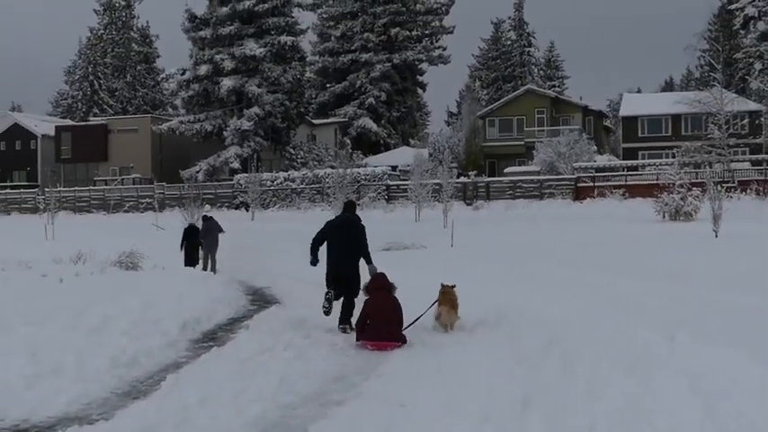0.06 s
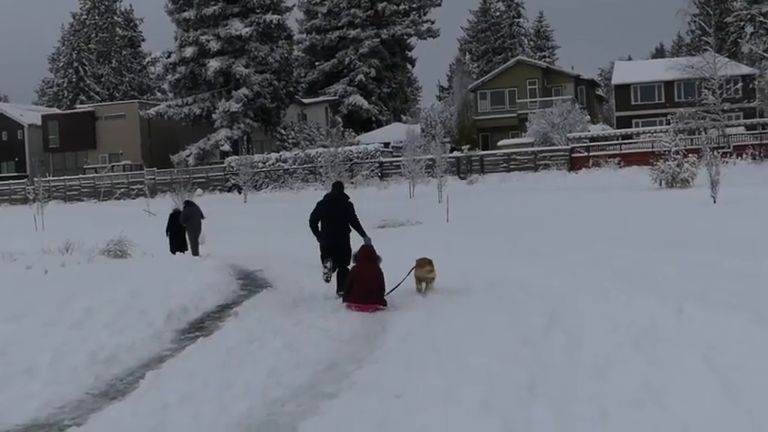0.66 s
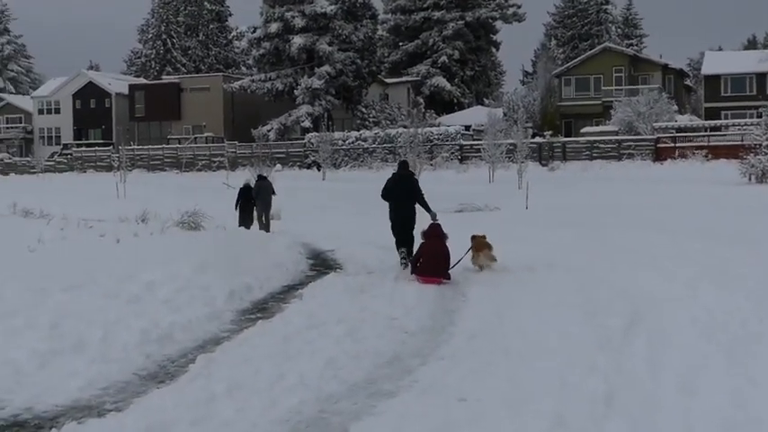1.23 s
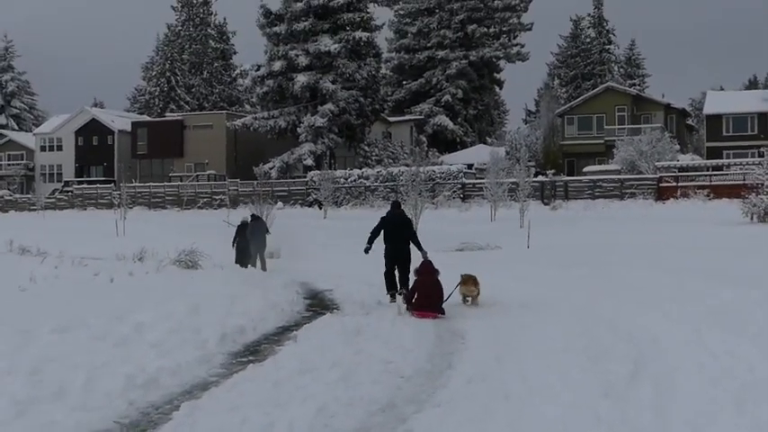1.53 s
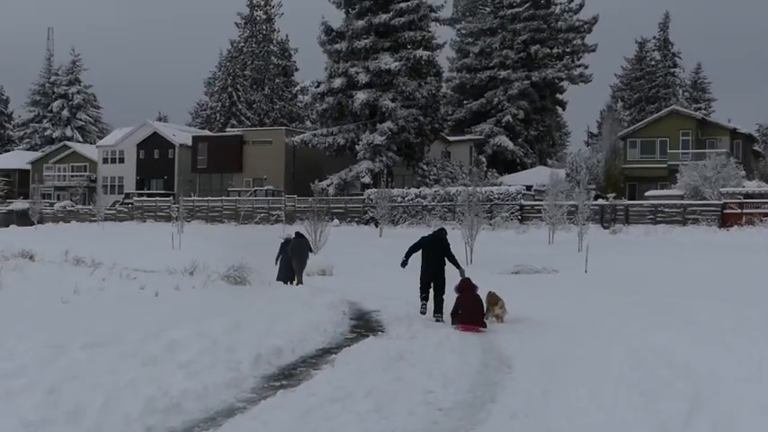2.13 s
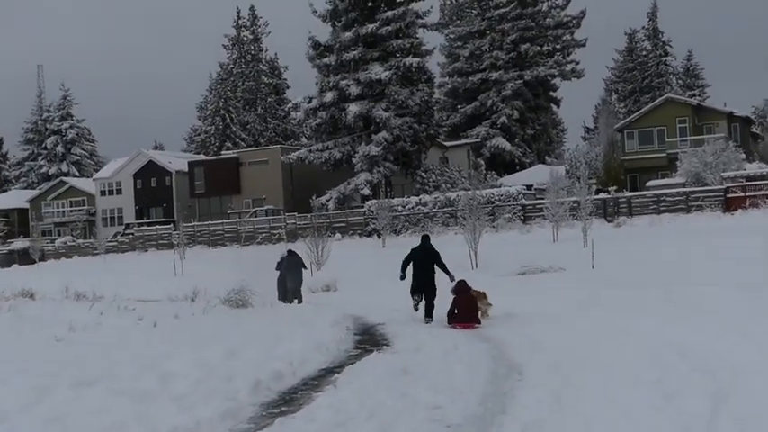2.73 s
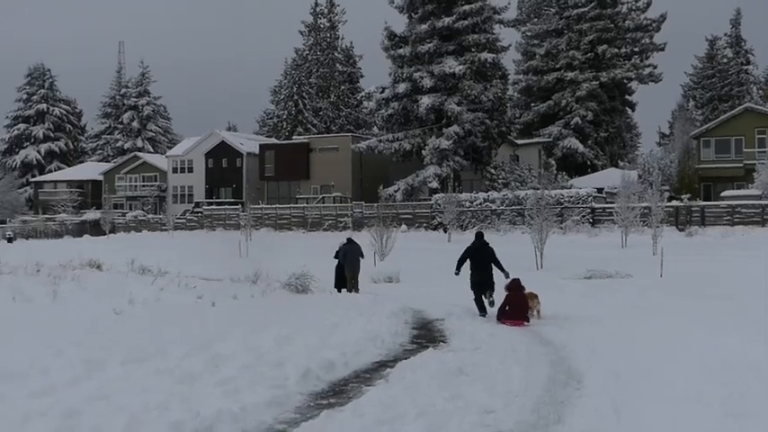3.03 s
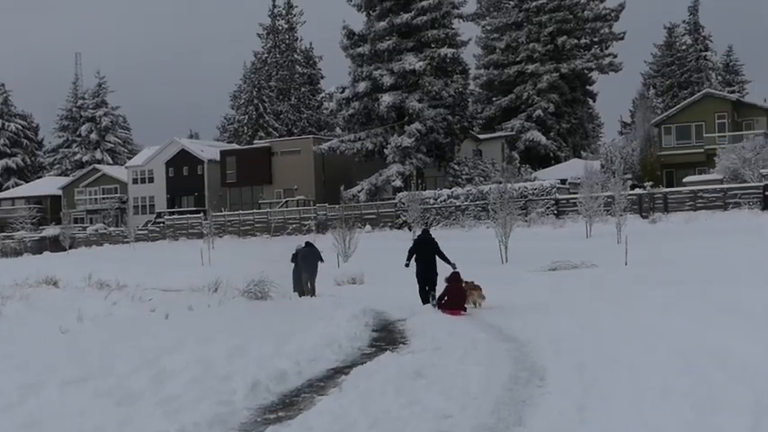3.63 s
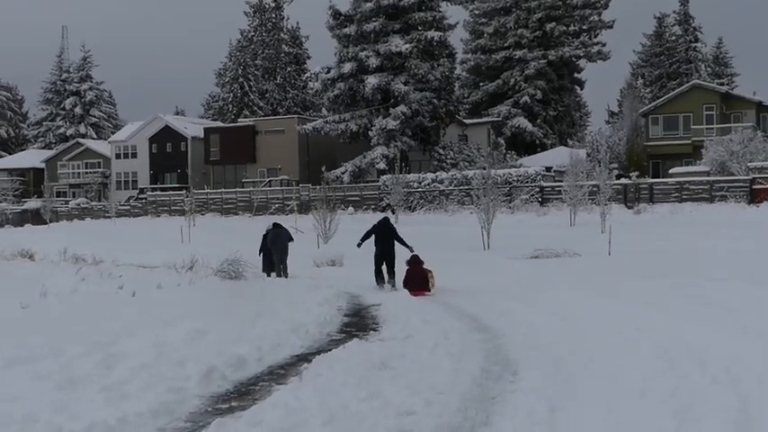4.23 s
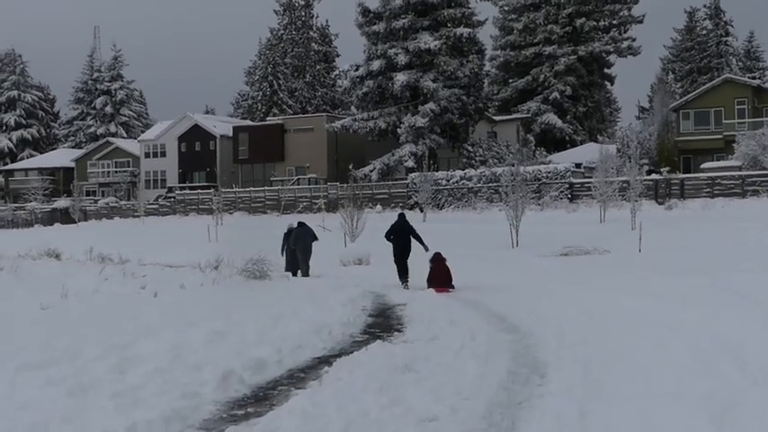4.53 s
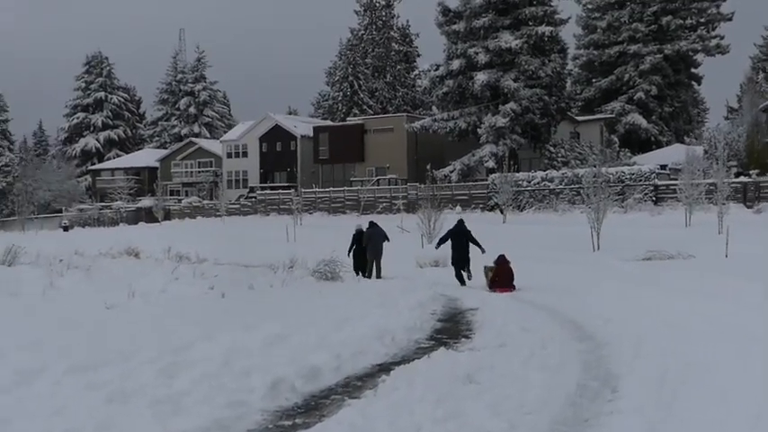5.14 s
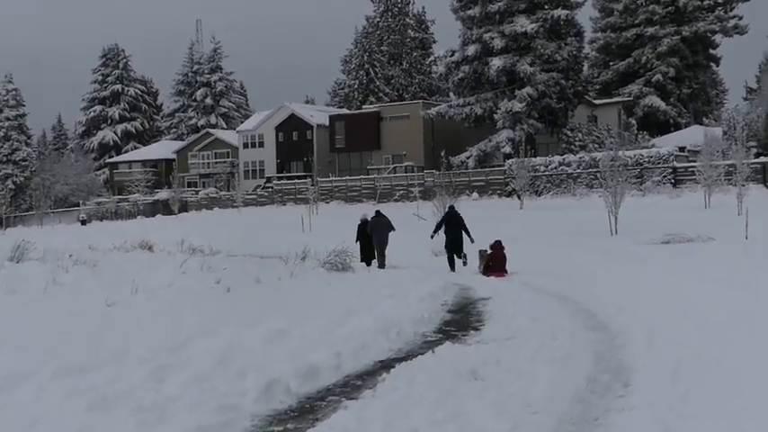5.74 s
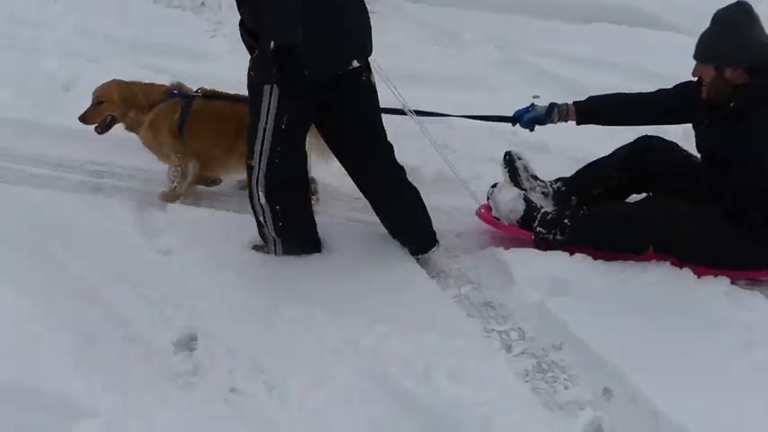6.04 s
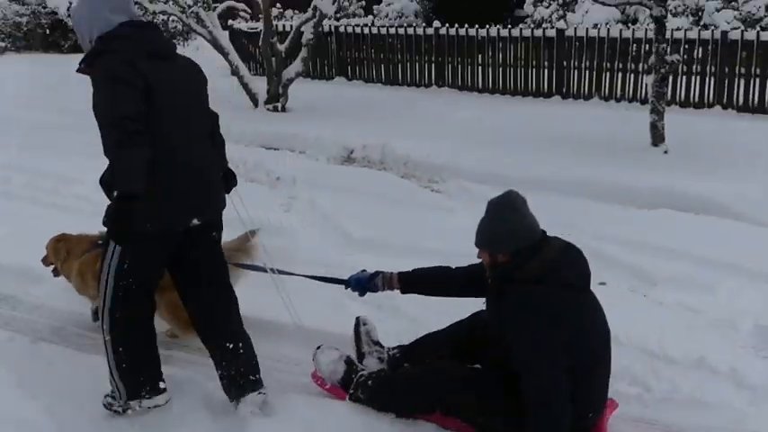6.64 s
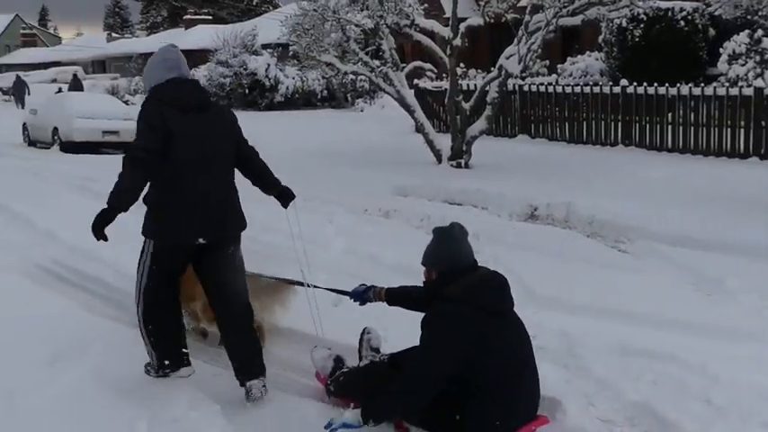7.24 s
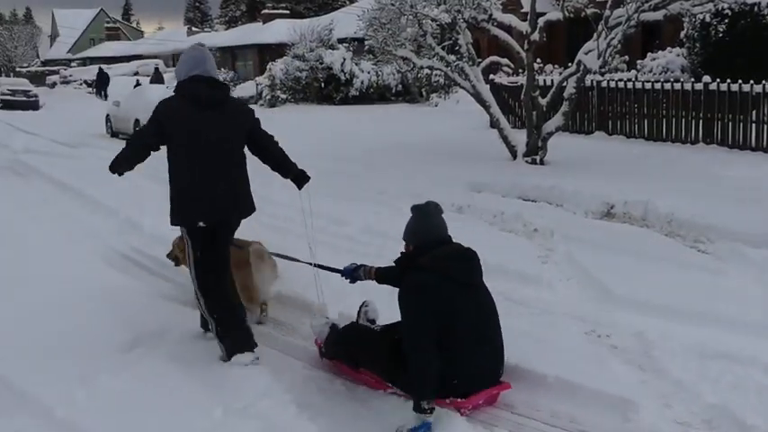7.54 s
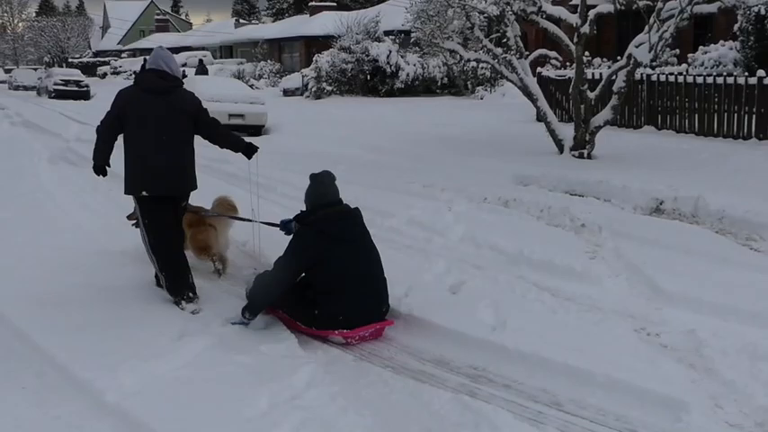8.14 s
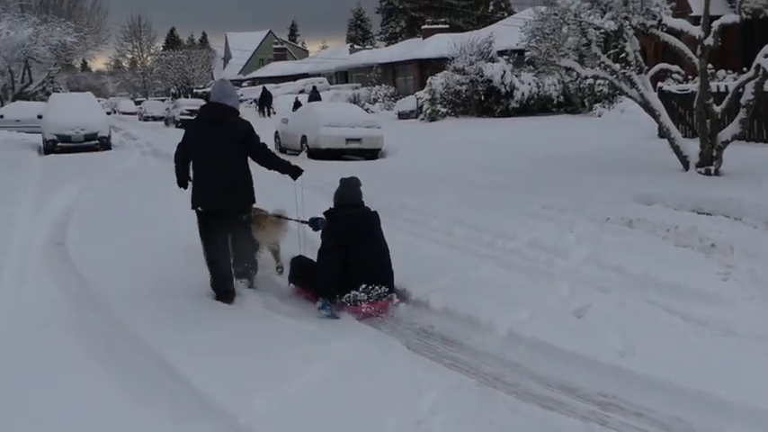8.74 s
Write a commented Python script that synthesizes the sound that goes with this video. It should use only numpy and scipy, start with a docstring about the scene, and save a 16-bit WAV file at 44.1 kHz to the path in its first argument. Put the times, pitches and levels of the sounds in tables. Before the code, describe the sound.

A nylon jacket rustles and squeaks lightly at the left of the microphone as someone treads through soft snow, with short, low bumps over a faint outdoor hush. After a moment of silence about six seconds in, a plastic sled slides by close up, its hollow shell rumbling and scraping with each pull. Loose snow hisses aside, gear clacks and a small clip tinkles faintly.

```python
"""A quiet, snowed-in neighbourhood. Someone walks through fresh, softly creaking snow while nylon
sleeves swish against a jacket on the left. Dull thuds come from footsteps or handling of the camera.
Near six seconds the sound cuts out briefly. It fades back in as a plastic sled is pulled past
close by, surging between the puller's steps. Snow grains break under the shell and make it drum,
loose powder hisses aside, and gear on the sled clacks and tinkles."""
import sys
import numpy as np
from scipy import signal
from scipy.io import wavfile
from scipy.ndimage import uniform_filter1d

SR = 44100
rng = np.random.default_rng(int(sys.argv[2]) if len(sys.argv) > 2 else 0)


def transcribe(u):
    """Save the signal u as a 16-bit wav file named by the first command-line argument.

    u: samples, shape (n,) or (channels, n), limited to [-1, 1]; the rate is SR.
    q: integer samples, one column per channel.
    """
    v = np.clip(np.atleast_2d(u).T, -1, 1)
    q = np.round(v * 32767).astype(np.int16)
    wavfile.write(sys.argv[1], SR, q)


N = 395697
TIME = np.arange(N) / SR
SLED_FROM_S = 6.0   # the walk gives way to the sled while the sound is out

# Tone colours: how strong each pitch is. Each row: frequency in Hz, relative level in dB.
AIR_COLOUR = [(40, -38), (183, 4.5), (461, 1.5), (1160, -11), (5050, -21), (7710, -35.5), (10700, -36.5),
              (13700, -42.5), (15500, -60)]
SNOW_COLOUR = [(26, -55), (45, -44.5), (80, -29.5), (112, 4.5), (188, 4.5), (363, -1), (686, -18.5),
               (1000, -24), (1300, -38.5), (2200, -120)]
JACKET_COLOUR = [(260, -28.5), (450, 3), (600, -11.5), (826, -4.5), (1180, -6), (1890, -13), (3420, -14.5),
                 (4880, -8.5), (7390, -17.5), (9510, -18.5), (15500, -34)]
SLED_COLOUR = [(41, -72), (70, -57), (150, -16.5), (230, -5), (420, 1), (595, -1), (822, -2), (1620, -7),
               (2850, -13), (5800, -22.5), (7690, -30), (11000, -23.5), (15500, -39.5)]
# Where a sound sits. Each row: frequency in Hz, side in dB (above zero is left, below is right).
AIR_SIDE = [(300, -1.5), (2400, 6.5), (15000, 1)]
JACKET_SIDE = [(500, -0.5), (800, 0.5), (1300, 12), (2400, 19), (4400, 5.5), (8000, 7), (15000, 1)]
CENTRE = [(100, -1.1), (1000, 0.87), (10000, 0)]
# How alike left and right are. Each row: frequency in Hz, likeness from 0 (unrelated) to 1 (same).
AIR_LIKENESS = [(100, 0.8), (3000, 0.1), (15000, 0.21)]
WALK_LIKENESS = [(100, 0.85), (300, 0.62), (1400, 0.085), (3000, 0.94), (6500, 0.35), (12000, 0.0)]
SLED_LIKENESS = [(100, 0.97), (7000, 0.92), (15000, 0.5)]

# Hits on plastic gear and on a small metal clip. Each row: start in seconds, level in dB.
GEAR_HITS = [(6.333, -35), (6.338, -30), (6.342, -30.5)]
CLIP_HITS = [(7.117, -51), (7.255, -52), (8.179, -45)]
# The tones they ring with. Each row: pitch in Hz, relative level in dB, ring time in cycles.
GEAR_TONES = [(756, -2, 3.7), (1090, 3, 6.8), (2430, -3, 2), (3970, 1.5, 5.9), (9500, -13, 1.8)]
CLIP_TONES = [(7300, 0, 90), (4540, -4, 73)]
# Nylon and sled plastic squeak.
# Each row: middle in seconds, level in dB, pitch in Hz, fade time in seconds, side in dB.
SQUEAKS = [(0.122, -47.5, 2200, 0.075, 14), (0.547, -40.5, 2190, 0.011, 15),
           (0.964, -45.5, 2236, 0.028, 17), (1.316, -25.5, 1365, 0.0063, 12), (2.212, -33, 1480, 0.016, 15),
           (2.715, -40, 1030, 0.022, 10), (3.644, -34, 1917, 0.032, 14), (3.725, -34.5, 2330, 0.022, 15),
           (4.335, -27, 848, 0.014, 6.5), (6.39, -39.5, 1260, 0.022, 3.5), (6.42, -32.5, 1186, 0.02, 3.5),
           (7.969, -39, 1250, 0.05, 5), (8.866, -35, 477.5, 0.072, -10.5)]
# Crisp rasps of cloth and snow crust.
# Each row: peak time in seconds, level in dB, rough pitch in Hz, base length in seconds.
RASPS = [(0.54, -42, 2190, 0.0075), (0.819, -32, 2430, 0.0027), (1.07, -35.5, 2210, 0.0054),
         (1.096, -33.5, 2500, 0.0038), (1.151, -23.5, 1490, 0.0022), (1.298, -34, 1960, 0.003),
         (1.309, -31, 1670, 0.0079), (1.379, -30.5, 2530, 0.0033), (1.409, -31.5, 2300, 0.0034),
         (1.64, -30, 4700, 0.0035), (2.008, -26, 4270, 0.00084), (2.063, -32.5, 1570, 0.0005),
         (2.214, -22.5, 1910, 0.0019), (2.232, -23, 2530, 0.003), (2.253, -30.5, 2360, 0.0057),
         (2.576, -32.5, 2300, 0.0018), (3.072, -33.5, 2520, 0.0029), (3.104, -26, 4330, 0.0026),
         (3.211, -19, 2770, 0.0049), (3.247, -26.5, 2510, 0.004), (3.34, -32.5, 3530, 0.0019),
         (3.51, -25.5, 1580, 0.0016), (3.719, -23.5, 3020, 0.0013), (3.78, -24.5, 2970, 0.0049),
         (3.866, -25, 1940, 0.0066), (3.924, -28.5, 3620, 0.0079), (4.291, -30.5, 1930, 0.017),
         (4.33, -23.5, 1600, 0.0029), (4.533, -21, 3900, 0.0032), (4.581, -32, 3880, 0.019),
         (4.683, -22.5, 3170, 0.0037), (5.01, -36.5, 1780, 0.0026), (5.287, -32.5, 3740, 0.0026),
         (5.751, -34.5, 3900, 0.0027), (6.63, -22.5, 1400, 0.0035), (6.637, -23, 1630, 0.0035),
         (6.84, -24.5, 1270, 0.0029), (6.961, -26, 1100, 0.0046), (7.371, -35, 1853, 0.014),
         (7.514, -28.5, 2120, 0.002), (7.569, -33, 1880, 0.0025), (7.594, -25, 1890, 0.0017),
         (7.727, -27, 2630, 0.0036), (7.81, -27.5, 1500, 0.007), (7.827, -42, 4500, 0.015),
         (8.24, -31, 3420, 0.0056), (8.243, -26, 1153, 0.0049), (8.359, -27.5, 1600, .005),
         (8.672, -44, 3340, 0.011), (8.861, -37.5, 2950, 0.0052)]
# Dull, short thuds with a falling pitch, from footsteps or handling of the camera.
# Each row: loudest moment in seconds, level in dB, pitch in Hz, side in dB, length in cycles.
THUDS = [(0.224, -27, 217.5, 2, 0.82), (0.353, -27, 257.3, 25, 1.6), (0.372, -23, 250, 10, 1.16),
         (0.596, -18.5, 408, -21, 1.4), (0.63, -26, 332, -29, 1.9), (0.791, -26.5, 305, 24, 1.1),
         (0.925, -23, 220, 6, 0.94), (1.135, -18.5, 303, -19, 0.86), (1.169, -25, 280, -10, 0.62),
         (1.49, -29, 325, 19, 0.73), (1.546, -24, 280, 12, 2), (1.575, -23, 356, 27, 1.3),
         (1.792, -25.5, 420, 15, 1.4), (1.897, -29, 300, 31, 3), (1.944, -22.5, 391.5, 34, 1.1),
         (2.27, -19.5, 296, 28.5, 0.96), (2.352, -22, 606.5, 13, 0.6), (2.36, -24, 320, 24, 2.5),
         (2.378, -21.5, 291, 26, 1.65), (2.406, -23, 240, 32, 2.3), (2.574, -25, 322, 21.5, 0.53),
         (2.821, -27.5, 313, 19, 0.65), (3.383, -27.5, 220, 10, 0.95), (3.512, -26, 690, 2, 1.2),
         (4.076, -32, 202, -3, 1.1), (4.212, -23, 343, -30, 1.9), (4.363, -24, 453, -29, 2),
         (4.685, -20.5, 366.4, -38, 2.2), (4.707, -24, 261, -7.5, 0.8), (5.143, -25, 710, 7, 2.2),
         (5.183, -18.5, 286, -15, 0.85), (5.208, -24, 297, -21, 0.69), (5.298, -28, 271, -22, 1),
         (5.348, -25.5, 327, -23, 0.77), (5.357, -19, 327, -28, 1.5), (5.51, -23, 303, 16, 1.27),
         (5.558, -21, 226, -7, 0.86), (5.61, -18.5, 435, -20, 1.4), (5.635, -21, 422, -26, 1.8),
         (5.647, -29, 707, -25, 2.8), (5.753, -30.5, 231, -7, 0.93), (5.87, -32, 397.5, -25, 2.4),
         (6.439, -32.5, 311.6, 3, 2.2), (6.547, -14, 727, -1.5, 0.94), (6.551, -18, 362, -1, 2.47),
         (6.573, -17.5, 296, 1, 1.1), (6.576, -25, 740, -1, 3.9), (6.642, -23, 667, 1, 2.6),
         (6.741, -23, 390, -1.5, 1.8), (6.84, -12.5, 668, 1.5, 1.7), (6.846, -13, 374, 1, 1.45),
         (6.902, -23, 422, -3, 1), (6.925, -14.5, 560.6, 1, 1.5), (6.929, -20.5, 240, -1, 1.6),
         (6.966, -20, 324, -1, 1.23), (7.071, -31.5, 598, 1, 2.1), (7.115, -29.5, 567, 3, 1.3),
         (7.255, -30.5, 482, -1, 1.1), (7.758, -20, 655, -0.5, 1.86), (8.107, -24.5, 340, -1, 2.1),
         (8.135, -26, 280, -5, 2.1), (8.151, -25.5, 308, 0, 1), (8.307, -19, 330.5, -2, 1.2),
         (8.429, -25.5, 570, -1, 2.7), (8.787, -24, 559, 1, 2.65), (8.933, -24, 561, -3, 1.5)]

# The walker's weight presses into the snow. Each row: start in seconds, hold in seconds, level in dB.
TREADS = [(0.35, 0.058, -36.5), (0.53, 0.14, -38), (0.91, 0.039, -41.5), (1.32, 0.24, -39.5),
          (1.72, 0.11, -39.5), (2.07, 0.28, -45.5), (2.29, 0.12, -35), (2.48, 0.17, -41.5),
          (2.76, 0.22, -47), (3.78, 0.41, -53.5), (4.17, 0.17, -40), (4.35, 0.17, -37.5),
          (4.6, 0.17, -41.5), (4.93, 0.15, -38.5), (5.1, 0.09, -41), (5.29, 0.13, -37), (5.58, 0.1, -35.5)]
# A sleeve sweeps along the jacket.
# Each row: start in seconds, hold in seconds, rubbing level in dB, hiss in dB above the rubbing.
SWISHES = [(0, 0.23, -52.5, -6), (0.234, 0.061, -42.5, -6), (0.312, 0.03, -47.5, -8),
           (0.467, 0.035, -46, -4), (0.625, 0.089, -51, -0.5), (0.821, 0.024, -41.5, -5),
           (0.98, 0.029, -53, 0), (1.298, 0.075, -46.5, -7.5), (1.433, 0.18, -50, -16),
           (1.575, 0.067, -36.5, -3), (1.673, 0.034, -40, -19), (1.738, 0.014, -33, -7.5),
           (1.764, 0.06, -39, -13.5), (2.191, 0.047, -44, -8), (2.632, 0.093, -51, -2),
           (3.014, 0.0036, -45, 0), (3.102, 0.032, -40, 0), (3.202, 0.045, -37.5, -4),
           (3.345, 0.11, -45, -4), (3.533, 0.29, -44.5, -3.5), (3.776, 0.058, -34, -2.5),
           (3.862, 0.087, -37, 0), (3.989, 0.038, -38, 1.5), (4.119, 0.1, -41.5, -2.5),
           (4.328, 0.047, -35.5, -1), (4.387, 0.15, -39.5, -3.5), (4.564, 0.055, -36, 2.5),
           (4.648, 0.038, -36.5, -2), (5.143, 0.02, -46, -6), (5.287, 0.072, -49, -4.5)]
# The jacket's rustle between swishes. Each row: time in seconds, base level in dB.
RUSTLE = [(0, -47.5), (2.6, -48), (2.9, -54.5), (3.5, -45), (4.3, -43), (4.6, -43.5), (5.0, -46.5),
          (5.7, -52.5), (5.87, -49)]
# The rope tightens and the sled surges.
# Each row: start in seconds, hold in seconds, scrape level in dB, rumble in dB above the scrape.
SURGES = [(6.44, 0.18, -41, -7), (6.58, 0.086, -35.5, 2.5), (6.671, 0.02, -35.5, 3.5),
          (6.736, 0.07, -40.5, 7), (6.894, 0.016, -40.5, 12.5), (7.194, 0.08, -45.5, 1),
          (7.369, 0.011, -46.5, 10), (7.512, 0.034, -46.5, 5), (7.67, 0.035, -33.5, -11),
          (7.734, 0.022, -29, 0), (7.809, 0.036, -33, 1), (8.106, 0.078, -45.5, 4.5), (8.29, .035, -36, 7),
          (8.347, 0.069, -37, 4), (8.465, 0.008, -36.5, -7.5), (8.514, 0.018, -34, -2.5)]
# The sled's glide between surges. Each row: time in seconds, base level in dB.
GLIDE = [(6.2, -53.5), (6.4, -49), (6.65, -42.5), (6.99, -52), (7.35, -57.5), (7.7, -49.5), (8.0, -50),
         (8.45, -52.5), (8.65, -54), (8.96, -56.5)]
# The rider's hand ploughs through powder. Each row: start in seconds, hold in seconds, level in dB.
PLOUGHS = [(6.36, 0.55, -47.5), (6.59, 0.13, -42.5), (7.73, .025, -48)]

# The hollow tone of the close pass, likely from the sled's shell and the bounce off the ground.
# Each row: frequency in Hz, width in Hz, boost or cut in dB.
HOLLOW_PEAKS = [(180, 41, 2.5), (280, 59, 1), (428, 150, -4), (570, 66, 2.5), (760, 66, 3.5),
                (1035, 180, -4.5)]
# The microphone's casing colours the treble. Each row: frequency in Hz, width in Hz, boost or cut in dB.
CASING_PEAKS = [(3730, 110, 2), (4240, 610, -2), (4740, 156, 1), (8000, 800, -2)]
# The sound cuts out and fades back in. Each row: time in seconds, gain in dB.
DROPOUT = [(5.878, 5), (5.895, -35), (5.93, -84), (6.11, -78), (6.13, -14), (6.21, -14), (6.27, -1),
           (6.33, 2)]


def from_db(db):
    """Turn decibels into a number to multiply by."""
    return 10 ** (np.asarray(db) / 20)


def rms_one(x):
    """Scale a sound so that its average power is one."""
    return x / np.sqrt(np.mean(x ** 2) + 1e-20)


def in_time(rows):
    """Join (seconds, value) points into a curve with a value for every sample."""
    return np.interp(TIME, *np.transpose(rows))


def at_hz(rows, hz):
    """Read a table at one frequency, with octaves evenly spaced."""
    frequencies, values = np.transpose(rows)
    return np.interp(np.log(hz), np.log(frequencies), values)


def band(x, low_hz, high_hz):
    """Keep what lies between two frequencies, with soft edges."""
    edges = np.clip([low_hz, high_hz], [10, 20], [.44 * SR, .45 * SR])
    return signal.sosfilt(signal.butter(2, edges, "band", fs=SR, output="sos"), x + 1e-18)


def ring(x, hz, cycles):
    """Make a sound ring on at one pitch, fading over the given cycles."""
    angle = 2 * np.pi * min(hz, .45 * SR) / SR
    decay = np.exp(-angle / (2 * np.pi * cycles))
    return signal.lfilter([1, 0, -1], [1, -2 * decay * np.cos(angle), decay * decay], x + 1e-18)


def peaked(x, peaks):
    """Boost or cut a few narrow frequency bands."""
    for hz, width_hz, db in peaks:
        narrow = signal.lfilter(*signal.iirpeak(hz, hz / width_hz, fs=SR), x + 1e-18)
        x = x + (from_db(db) - 1) * narrow
    return x


def pan(side_db):
    """Left and right gains that move a sound sideways and keep its power."""
    return rms_one(from_db(np.array([[.5], [-.5]]) * side_db))


def drift(rate_hz):
    """A smooth random wobble, about one unit in size."""
    decay = np.exp(-2 * np.pi * rate_hz * 40 / SR)   # one value every 40 samples
    noise = rng.standard_normal(N // 40 + 2002)
    slow = signal.lfilter([1], [1, -2 * decay, decay * decay], noise)[2000:]
    return np.interp(np.arange(N) / 40, np.arange(len(slow)), rms_one(slow))


def grains(per_s, spread_db, smooth):
    """Four separate streams of tiny, uneven snaps over smooth rubbing noise."""
    shape = (2, 2, N)
    noise = rng.standard_normal(shape)
    snaps = rng.random(shape) < per_s / SR
    sizes = from_db(spread_db * np.minimum(rng.exponential(1, shape), 4))
    return rms_one(rms_one(snaps * sizes * np.sign(noise)) + smooth * noise)


def coloured(streams, colour, likeness, side, flicker_db, flicker_hz):
    """Split noise into half-octave stereo bands that each flicker; gives (Hz, sound) pairs."""
    edges, bands = 31.25 * 2 ** np.arange(0, 9.1, .5), []
    for k, (low, high) in enumerate(zip(edges, edges[1:])):
        hz = np.sqrt(low * high)
        if colour[0][0] / 2 < hz < colour[-1][0] * 2:
            shared, apart = band(streams[k % 2], low, high)
            alike = np.clip(at_hz(likeness, hz), -1, 1)
            stereo = np.sqrt(1 + alike) * shared + np.sqrt(1 - alike) * apart * [[1], [-1]]
            gain = from_db(at_hz(colour, hz) + flicker_db * drift(flicker_hz))
            bands.append((hz, stereo * pan(at_hz(side, hz)) * gain))
    return bands


def crackles(colour, side, per_s, ring_s, spread_db):
    """Crumbs or creases click and ring, low ones for longer; gives (Hz, sound) pairs."""
    pitches, bands = np.geomspace(1050, 7000, num=36), []
    count = max(round(per_s * N / SR / len(pitches)), 1)
    for hz in pitches * rng.uniform(.97, 1.03, len(pitches)):
        when, size = rng.random((600, 2))[:count].T
        clicks = np.zeros(N)
        clicks[(when * N).astype(int)] = from_db(spread_db * size ** 2)
        cycles = ring_s * np.sqrt(2000 * hz)   # ring_s is the fade time at 2000 Hz
        tone = rms_one(ring(clicks, hz, cycles)) * np.sqrt(hz)
        bands.append((hz, tone * from_db(at_hz(colour, hz)) * pan(at_hz(side, hz))))
    return bands


def mix_bands(bands, low_hz=0, high_hz=SR):
    """Add up the bands in one frequency range, at a power of one."""
    return rms_one(sum(x for hz, x in bands if low_hz <= hz < high_hz))


def effort(moves, attack_s, release_s, resting_db):
    """A loudness curve: each move (start, hold, dB) swells, holds and sinks back to rest."""
    t, power = TIME[::40], 0
    for start, hold, db in moves:
        fade = np.maximum(start - t, 0) / attack_s + np.maximum(t - start - hold, 0) / release_s
        power = power + (from_db(db) * np.exp(-fade)) ** 2
    return np.sqrt(np.interp(TIME, t, power) + from_db(resting_db) ** 2)


def add(out, burst, start_s, level_db, length_s):
    """Mix in a short sound with as much energy as level_db held for length_s."""
    power = np.mean(burst ** 2, axis=0)
    scaled = burst * from_db(level_db) * np.sqrt(length_s * SR / power.sum())
    start = round(start_s * SR)
    first, last = max(start, 0), min(start + len(power), N)
    out[:, first:last] += scaled[:, first - start:last - start]


def air(walk_db=-49, sled_db=-53.5):
    """The soft hush of the neighbourhood, a little quieter once the sled is heard."""
    noise = rng.standard_normal((2, 2, N))
    bands = coloured(noise, AIR_COLOUR, AIR_LIKENESS, AIR_SIDE, flicker_db=3.5, flicker_hz=2.1)
    return from_db(np.where(TIME < SLED_FROM_S, walk_db, sled_db)) * mix_bands(bands)


def struck_object(hits, tones, contact_s):
    """Each hit is a short, rough touch that sets the object's own tones ringing."""
    out, t = np.zeros((2, N)), np.arange(3000) / SR
    for start, db in hits:
        contact = rng.standard_normal(len(t)) * np.exp(-t / contact_s)
        sound = sum(from_db(tone_db) * rms_one(ring(contact, hz, cycles)) for hz, tone_db, cycles in tones)
        add(out, sound * pan(0), start, db, 2 * contact_s)
    return out


def squeaks(wander=0.0797, lumpy_db=6.5, scratchy=0.23, octave_db=-14):
    """Nylon or plastic sticks and slips so fast that it makes a rough, wavering note."""
    out, t = np.zeros((2, N)), np.arange(-5000, 5000) / SR
    knots = t[::100]
    for middle, db, hz, length, side_db in SQUEAKS:
        waver, lumps = (np.interp(t, knots, row) for row in rng.standard_normal((2, len(knots))))
        phase = 2 * np.pi * np.cumsum(hz * (1 + wander * waver)) / SR
        tone = rms_one(np.sin(phase) + from_db(octave_db) * np.sin(2 * phase))
        scratch = rms_one(band(rng.standard_normal(len(t)), hz, 3.1 * hz))
        swell = from_db(lumpy_db * lumps) * np.exp(-(t / length) ** 2)
        add(out, (tone + scratchy * scratch) * swell * pan(side_db), middle + t[0], db, length)
    return out


def rasps(spread=1.74, lumpy_db=3.5, rise=0.034, fall=2.6, ring_db=4, top_db=-19):
    """Cloth or snow crust gives a sudden rush of crackles that rings at three random pitches."""
    out, t = np.zeros((2, N)), np.arange(-1000, 4000) / SR
    knots = t[::50]
    for peak, db, hz, length in RASPS:
        noise = rng.standard_normal((3, len(t)))   # shared, left, right
        lumps = from_db(lumpy_db * np.interp(t, knots, rng.standard_normal(len(knots))))
        swell = np.exp(-np.abs(t) / (length * np.where(t < 0, rise, fall)))
        crackle = (noise[0] + 0.24 * noise[1:]) * lumps * swell
        rush = rms_one(band(crackle, hz / spread ** 2, hz * spread / 1.11))
        pitches = hz * np.exp(rng.normal(-0.11, .18, size=3))
        ringing = rms_one(sum(rms_one(ring(rush, pitch, cycles=7.2)) for pitch in pitches))
        top = rms_one(band(crackle, hz, 3 * hz))
        rasp = rush + from_db(ring_db) * ringing + from_db(top_db) * top
        side_db = 0 if peak > SLED_FROM_S else 17   # centred at the sled, left at the walker
        add(out, rasp * pan(side_db), peak + t[0], db, length)
    return out


def thuds(rise=0.15, fall=0.7, pitch_drop=0.23, overtone=1.7, jolts_per_s=300, settle_s=0.013,
          firm_db=-19, thump_hz=185, overtone_db=-11, thump_db=-9, grit_db=-20):
    """Footsteps or handling of the camera make dull, short thuds that fall in pitch."""
    out, t = np.zeros((2, N)), np.arange(-900, 3000) / SR
    elapsed = t - t[0]
    for peak, db, hz, side_db, cycles in THUDS:
        length = cycles / hz
        force_db = 0.53 * (db - firm_db)   # louder thuds reach both deeper and higher
        swell = np.exp(-np.logaddexp(-t / (rise * length), t / (fall * length)))
        turns = np.cumsum(hz * (1 - pitch_drop * np.tanh(t / length))) / SR
        low, high = np.sin(2 * np.pi * (np.outer([1, overtone], turns) + rng.random((2, 1))))
        tone = swell * (low + from_db(overtone_db + force_db) * high)
        # one main jolt and a few smaller ones after it each set off the tone
        jolting = rng.random((3, len(t))) < jolts_per_s / SR   # shared, left, right
        small = jolting * rng.standard_normal((3, len(t))) * np.exp(-elapsed / settle_s)
        jolts = (elapsed == 0) + 0.2 * small[0] + 0.29 * small[1:]
        knock = rms_one(signal.fftconvolve(jolts, tone[None], axes=1)[:, :len(t)])
        thump = rms_one(band(t == 0, 0.84 * thump_hz, 1.45 * thump_hz))
        grit = rms_one(band(rng.standard_normal(len(t)) * swell, 2 * hz, 2.46 * hz))
        thud = knock + from_db(thump_db + force_db) * thump + from_db(grit_db + force_db) * grit
        thud = band(thud, 120, 12980) * pan(side_db)
        power = uniform_filter1d(np.mean(thud ** 2, axis=0), size=60)
        add(out, thud, peak - np.argmax(power) / SR, db, length)
    return out


def packing_snow():
    """Snow creaks softly as the walker's weight presses down on it."""
    weight = effort(TREADS, attack_s=0.015, release_s=0.03, resting_db=-50.5)
    snaps = grains(per_s=260, spread_db=4.7, smooth=0.077)
    creak = coloured(snaps, SNOW_COLOUR, WALK_LIKENESS, CENTRE, flicker_db=4.0, flicker_hz=8.2)
    return weight * mix_bands(creak) * (TIME < SLED_FROM_S)


def jacket(attack_s=0.009, release_s=0.01, nylon_hz=2320, nylon_db=-5, body_db=-2.5):
    """Nylon sleeves rub and crinkle against the jacket at each swing of an arm."""
    rustle_db = in_time(RUSTLE)
    rub_moves = [row[:3] for row in SWISHES]
    hiss_moves = [(start, hold, db + hiss_db) for start, hold, db, hiss_db in SWISHES]
    rubbing = effort(rub_moves, attack_s, release_s, rustle_db - 3.5)
    hissing = effort(hiss_moves, attack_s, release_s, rustle_db - 10.5)
    weave = grains(per_s=3500, spread_db=2.5, smooth=0.72) * from_db(1.7 * drift(92))
    cloth = coloured(weave, JACKET_COLOUR, WALK_LIKENESS, JACKET_SIDE, flicker_db=3.0, flicker_hz=18.7)
    creases = crackles(JACKET_COLOUR, JACKET_SIDE, per_s=700, ring_s=0.006, spread_db=11.5)
    body = from_db(body_db) * mix_bands(cloth, 0, 1000)
    rub = rms_one(mix_bands(cloth, 1000, 4000) + 0.97 * mix_bands(creases, 1000, 4000))
    singing = rms_one(ring(rub, nylon_hz, cycles=1.1))   # the tight weave sings at one pitch
    rub = rms_one(rub + from_db(nylon_db) * singing)
    hiss = rms_one(mix_bands(cloth, 4000) + 0.45 * mix_bands(creases, 4000))
    return (rubbing * (body + rub) + hissing * hiss) * (TIME < SLED_FROM_S)


def sled(attack_s=0.015, release_s=0.025, spray_db=-17):
    """Snow grains break under the drumming plastic shell; surges and a trailing hand spray powder."""
    glide_db = in_time(GLIDE)
    scrape_moves = [row[:3] for row in SURGES]
    rumble_moves = [(start, hold, db + rumble_db) for start, hold, db, rumble_db in SURGES]
    scraping = effort(scrape_moves, attack_s, release_s, glide_db + 3.5)
    drumming = effort(rumble_moves, attack_s, release_s, glide_db + 3)
    ploughing = effort(PLOUGHS, attack_s=0.079, release_s=0.022, resting_db=glide_db - 2)
    spraying = np.hypot(from_db(spray_db) * scraping, ploughing)
    snaps = grains(per_s=2200, spread_db=1.15, smooth=0.75) * from_db(0.73 * drift(61))
    sliding = coloured(snaps, SLED_COLOUR, SLED_LIKENESS, CENTRE, flicker_db=2.5, flicker_hz=24)
    crumbs = crackles(SLED_COLOUR, CENTRE, per_s=480, ring_s=0.0048, spread_db=12.5)
    shell = mix_bands(sliding, 0, 1000)
    scrape = rms_one(mix_bands(sliding, 1000, 4000) + 0.69 * mix_bands(crumbs, 1000, 4000))
    powder = rms_one(mix_bands(sliding, 4000) + 0.51 * mix_bands(crumbs, 4000))
    return (drumming * shell + scraping * scrape + spraying * powder) * (TIME > SLED_FROM_S)


def scene():
    """Mix all the sources. Snow swallows the echoes; only the close pass gets a hollow tone."""
    clacks = struck_object(GEAR_HITS, GEAR_TONES, contact_s=0.0018)
    tinkles = struck_object(CLIP_HITS, CLIP_TONES, contact_s=0.0041)
    thudding, close = thuds(), TIME > SLED_FROM_S
    close_pass = peaked(thudding * close + sled(), HOLLOW_PEAKS)
    small_sounds = rasps() + squeaks() + clacks + tinkles
    walk = thudding * ~close + packing_snow() + jacket()
    return walk + close_pass + small_sounds + air()


def record(dry, bass_hz=55, notch_hz=7500, top_hz=15700):
    """The recorder thins the deep bass, colours the treble, cuts out once and trims the very top."""
    thinned = signal.sosfilt(signal.butter(2, bass_hz, "high", fs=SR, output="sos"), dry)
    notched = signal.lfilter(*signal.iirnotch(notch_hz, 30, fs=SR), peaked(thinned, CASING_PEAKS))
    interrupted = notched * from_db(in_time(DROPOUT))
    return signal.sosfilt(signal.ellip(10, .2, 80, top_hz, fs=SR, output="sos"), interrupted)


dry = scene()
out = record(dry)
transcribe(out)
```